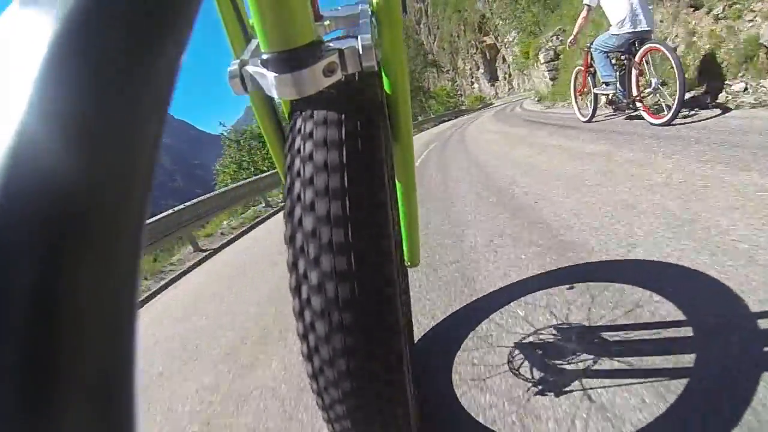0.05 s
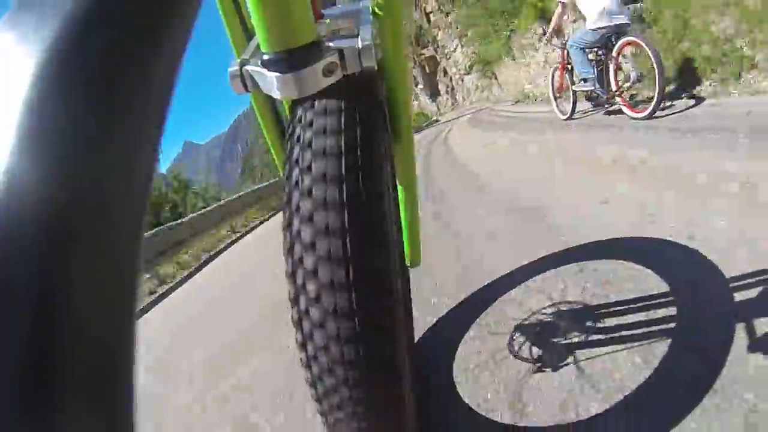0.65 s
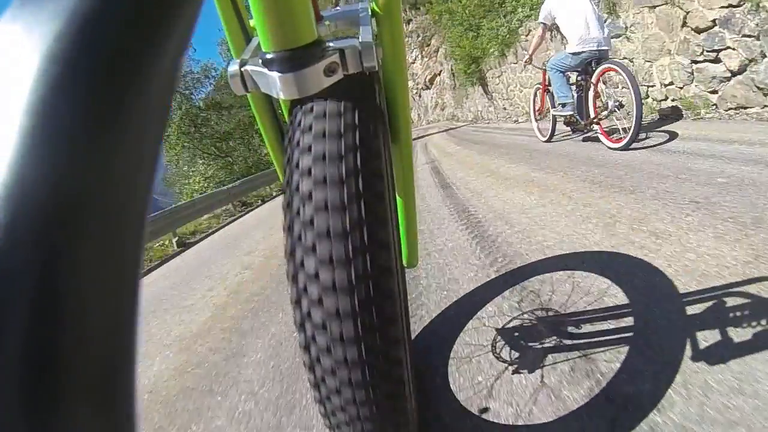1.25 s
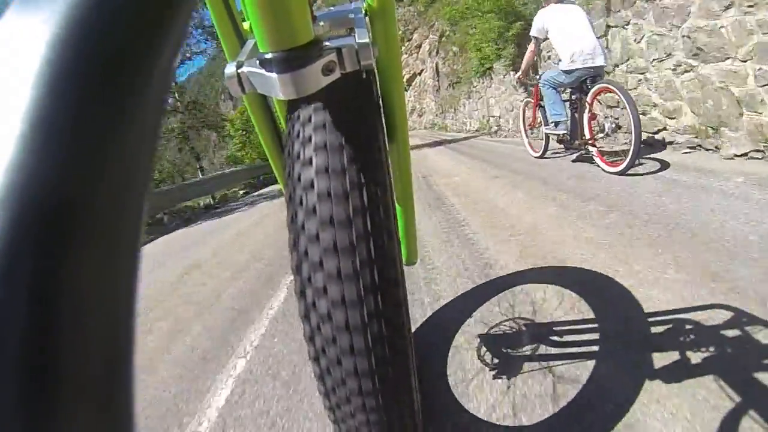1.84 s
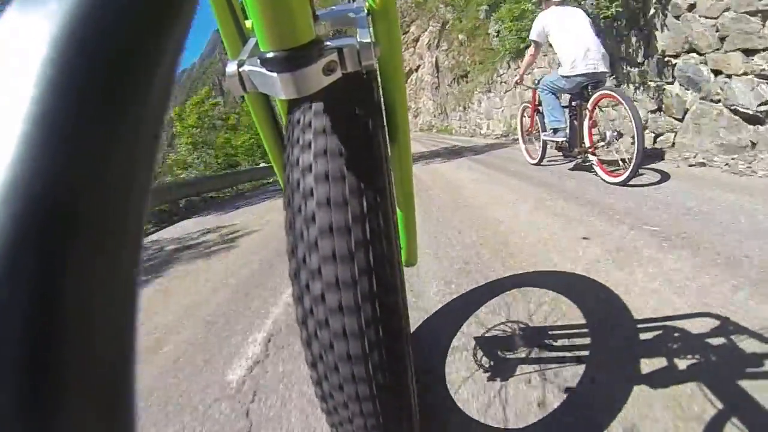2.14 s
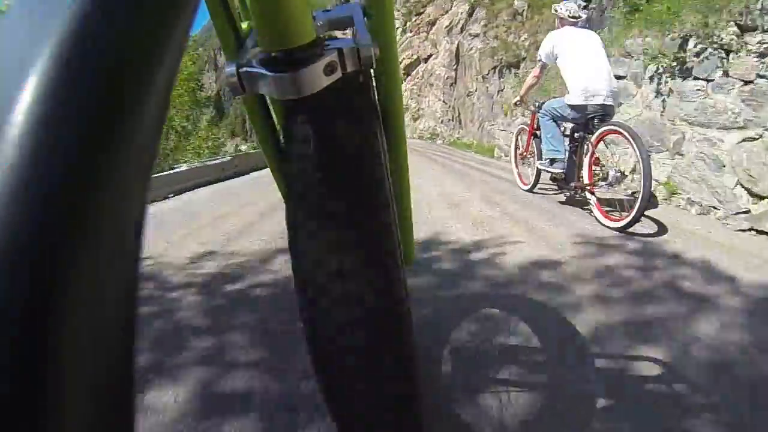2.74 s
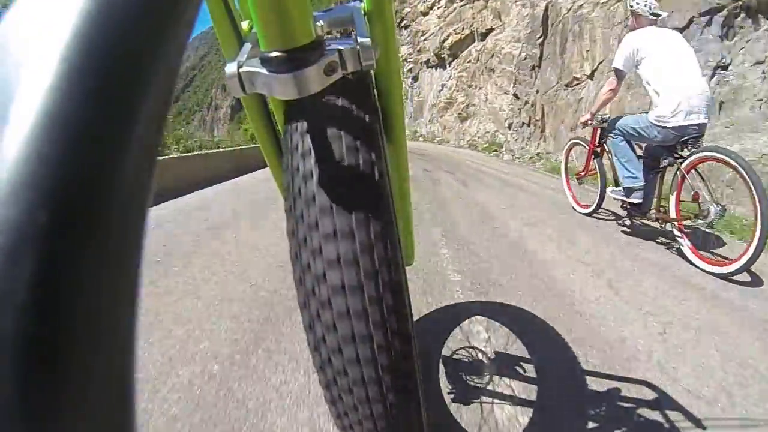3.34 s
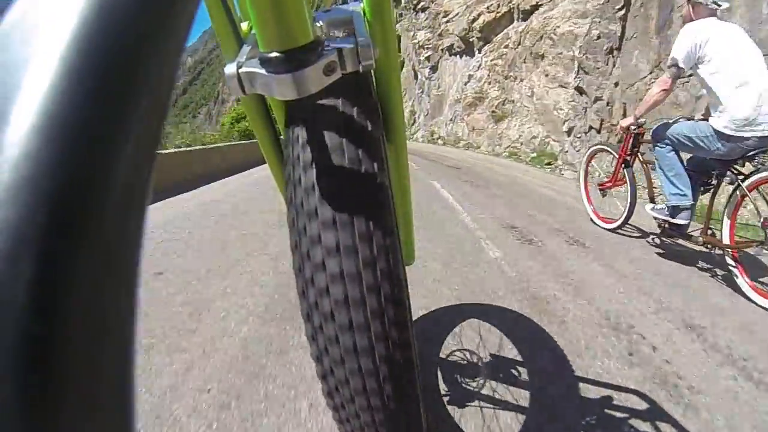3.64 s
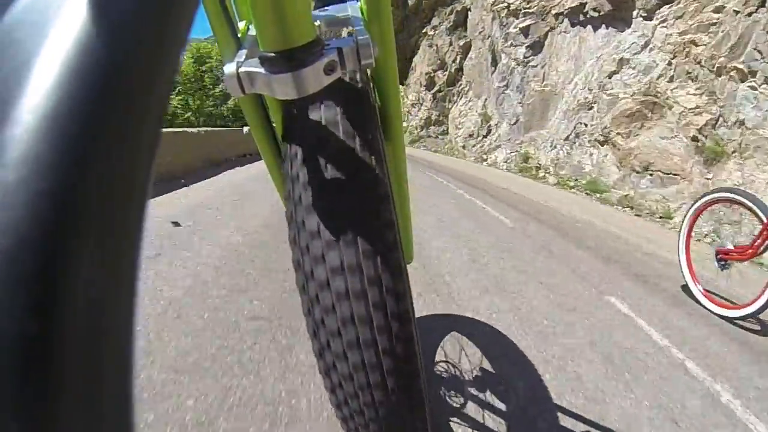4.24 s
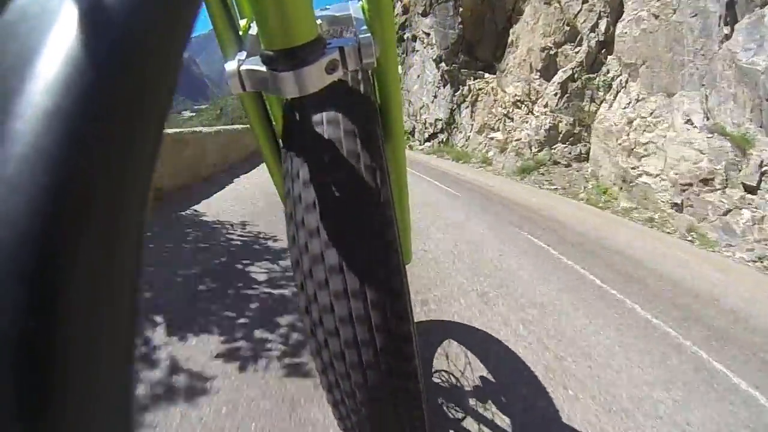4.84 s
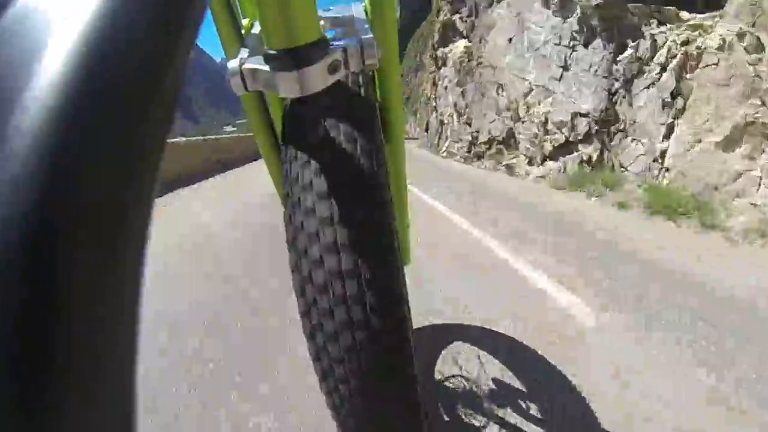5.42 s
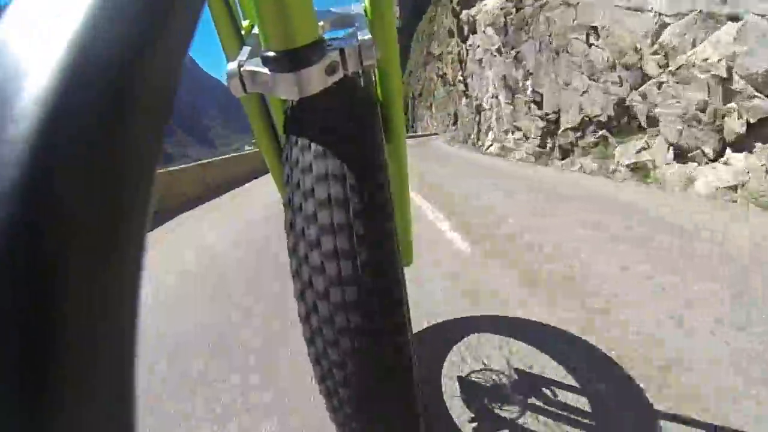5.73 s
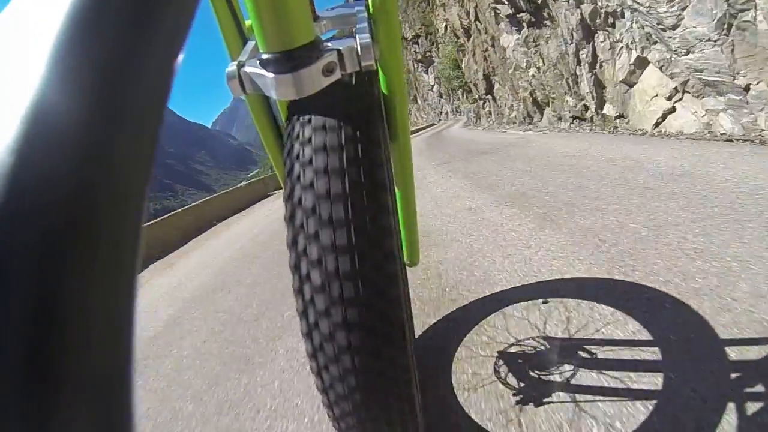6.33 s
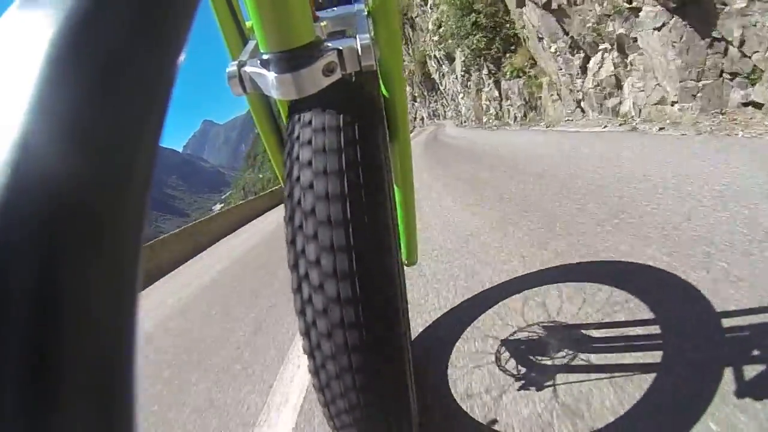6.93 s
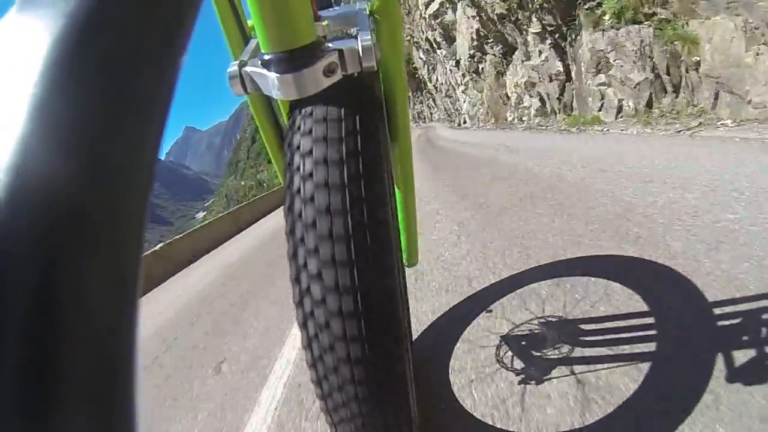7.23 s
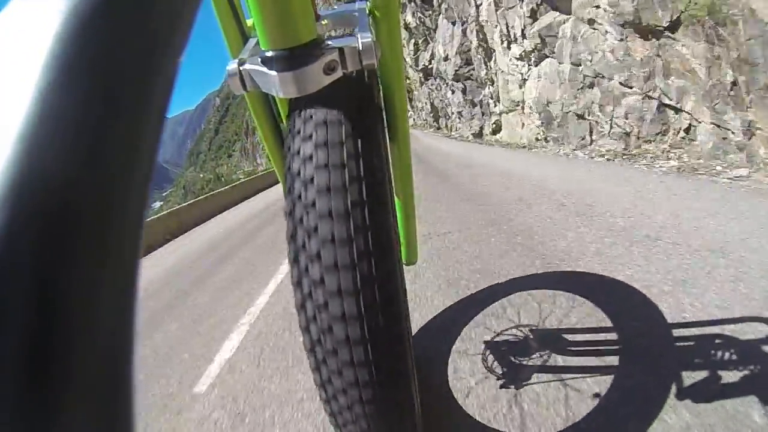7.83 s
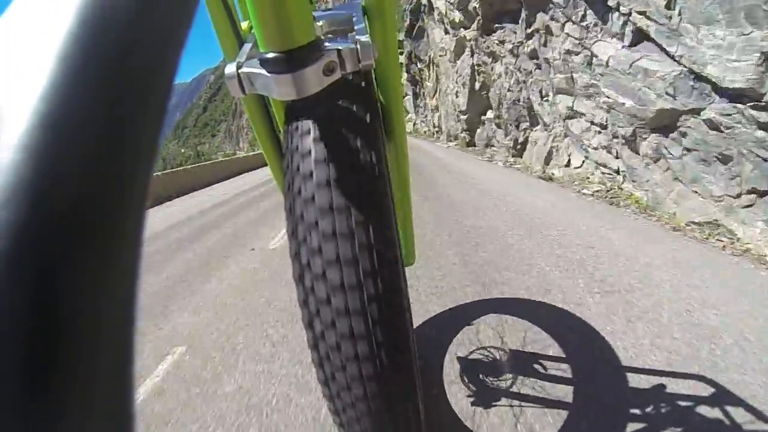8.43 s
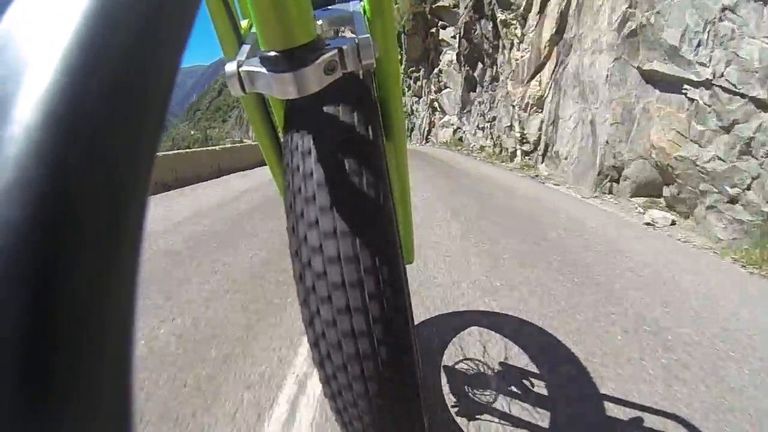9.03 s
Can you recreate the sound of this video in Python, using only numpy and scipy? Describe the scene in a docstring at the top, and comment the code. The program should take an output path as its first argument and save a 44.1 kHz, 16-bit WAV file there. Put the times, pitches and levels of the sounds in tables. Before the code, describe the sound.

Low, fluttering wind hits a microphone mounted close to the wheel of a bicycle rolling downhill outdoors. The tyres roar on rough asphalt, their hum coming and going and climbing with the speed, while the freewheel buzzes softly and a brake pad faintly brushes its disc. Irregular wind thumps build toward the middle, edged with light crackle. Three quick metallic pings of grit follow, then more buffets.

```python
"""A bicycle coasts ever faster down an asphalt mountain road, a camera in a plastic housing by its fork.
From the start wind rumbles on the housing, road grain roars through the frame, the tread hums, the
freewheel buzzes and a brake pad brushes its disc. The hum rises with the speed. From 2.6 s large eddies
strike, the hardest making the camera's limiter duck everything for a moment. By 5 s a fine crackle has
grown on the wind's crests. Near 6.6 s three bits of grit ping off metal; the buffets go on to the end."""
import sys
import numpy as np
from scipy import signal
from scipy.fft import rfft, irfft, next_fast_len
from scipy.io import wavfile
from scipy.ndimage import uniform_filter1d

SR = 44100
rng = np.random.default_rng(int(sys.argv[2]) if len(sys.argv) > 2 else 0)


def inscribe(sig):
    """Save sig as 16-bit PCM at rate SR to the path in sys.argv[1].

    A 1-D sig is mono; a 2-D sig holds one channel per row.
    Samples are clipped to [-1, 1] before scaling.
    """
    pcm = np.round(np.clip(np.atleast_2d(sig).T, -1, 1) * 32767)
    wavfile.write(sys.argv[1], SR, pcm.astype(np.int16))


N = 404397
TIME = np.arange(N) / SR
BLOCKS_PER_TURN = 87  # tread blocks round the tyre


def undb(db):
    """Amplitude ratio of a level: tenfold for every 20 dB."""
    return 10 ** (np.asarray(db) / 20)


def unit(x):
    """Normalisation to an rms of 1."""
    return x / np.sqrt(np.mean(x ** 2))


def curves(table):
    """Linear interpolation of each column against the first, t/s."""
    t, *columns = np.transpose(table)
    return [np.interp(TIME, t, column) for column in columns]


def walk(rate_hz):
    """Random modulation: Gaussian noise of rms 1, low-passed at rate_hz."""
    size = next_fast_len(N)
    f = np.fft.rfftfreq(size, 1 / SR)
    spectrum = rfft(rng.standard_normal(size)) / (1 + (f / rate_hz) ** 4)
    return unit(irfft(spectrum)[:N])


def resonance(x, hz, width_hz):
    """Band-pass response to the excitation x, at an rms of 1."""
    band = signal.butter(2, [hz - width_hz / 2, hz + width_hz / 2], "band", fs=SR, output="sos")
    return unit(signal.sosfilt(band, x))


def body(x, colour, modes=(), size=16384):
    """Minimum-phase filtering: a broad response with resonance peaks standing on it."""
    f = np.maximum(np.fft.rfftfreq(size, 1 / SR), 1)
    hz, db = np.transpose(colour)
    broad_db = np.interp(np.log(f), np.log(hz), db)
    peaks_db = sum(lift / (1 + (2 * (f - centre) / width) ** 2) for centre, width, lift in modes)
    cepstrum = irfft(np.log(undb(broad_db + peaks_db)))
    fold = 1 + np.sign(np.fft.fftfreq(size))  # makes the response causal
    impulse_response = irfft(np.exp(rfft(cepstrum * fold)))
    return signal.fftconvolve(x, impulse_response)[:len(x)]


def brake(rough_db=2.5):
    """Stick-slip friction: the pad excites two high modes of the disc, a thin sizzle."""
    # disc resonances: f/Hz, width/Hz
    disc_modes = [(11880, 480), (13230, 230)]
    # their strength re the frame roar: t/s, lower mode level/dB, upper mode level/dB
    mode_levels = [(0, -33, -48), (1.1, -33.5, -47), (1.4, -32, -39), (2.5, -41, -49), (3.1, -38, -40),
                   (4.3, -37, -39.5), (6, -36.5, -52.5), (9.17, -41, -55.5)]
    sizzle = 0
    for (hz, width_hz), db in zip(disc_modes, curves(mode_levels)):
        friction = rng.standard_normal(N) * undb(rough_db * walk(120))
        sizzle = sizzle + resonance(friction, hz, width_hz) * undb(db)
    return sizzle


def freewheel(turns, teeth_per_turn=20, strike_db=17, scrape_s=0.0055, scatter_db=0.5):
    """Periodic impact: a pawl strikes and scrapes at each ratchet tooth, ringing the hub."""
    # broad response of the hub: f/Hz, level/dB
    hub_colour = [(1500, -24), (4400, -7.5), (5250, -2.5), (6100, -11), (7200, -32), (8400, -9.5),
                  (9750, -9.5), (10200, -18), (11000, -20), (11900, -15.5), (12500, -9.5), (13400, -14),
                  (13900, -24), (15000, -22)]
    # hub resonances: f/Hz, width/Hz, lift/dB
    hub_modes = [(4690, 70, 7), (4937, 40, 9), (5012, 30, 6), (5155, 90, 14.2), (5345, 90, 12),
                 (5485, 44, 8.5), (5935, 30, 6), (6010, 60, 13), (8270, 90, 5), (8870, 200, 9),
                 (9820, 70, 8)]
    teeth = teeth_per_turn * turns
    age_s = teeth % 1 / np.gradient(teeth) / SR
    scrapes = rng.standard_normal(N) * np.exp(-age_s / scrape_s)
    scrapes *= undb(scatter_db * rng.standard_normal(N)[teeth.astype(int)])
    strikes = np.diff(np.floor(teeth), prepend=0) * undb(strike_db)
    hub = body(strikes + scrapes, hub_colour, hub_modes)
    # the pawl's force throbs three times a turn, most of all in the low shell modes
    throb_db = 3.4 * np.sin(2 * np.pi * 3 * turns)
    shell = signal.sosfiltfilt(signal.butter(4, 7000, fs=SR, output="sos"), hub)
    return unit(shell * undb(throb_db) + (hub - shell) * undb(.4 * throb_db))


def grit(crack_s=0.0031, tail_s=0.015, tail_db=-11, size=8192):
    """Impact and free decay: a stone cracks against metal, which rings; a glancing blow is duller."""
    # stones flung at the frame: t/s, level/dB, ring level re the crack/dB, low-pass f/Hz
    stones = [(6.561, -25, -9.5, 7500), (6.654, -26.5, -10, 3200), (6.744, -18.8, -12, 15000)]
    # spectrum of the crack: f/Hz, level/dB
    crack_colour = [(300, -11), (800, 0), (1500, 3), (2650, 10), (3400, 3), (5000, -.5), (6500, -5),
                    (7600, -20), (9500, -7.5), (11000, -11), (12500, -15), (15000, -17)]
    # modes of the metal: f/Hz, level/dB, T60/s
    metal_modes = [(1728, 4, .13), (2148, -5, .08), (2546, -2, .11), (2620, -2, .04), (2870, -8, .04),
                   (3600, -9, .035), (5157, -12, .04), (6200, -21, .07), (8829, -14, .12), (8931, -17, .1),
                   (9555, -22, .1), (10490, -23, .08)]
    pings, age = np.zeros(N), np.arange(size) / SR
    envelope = np.exp(-age / crack_s) + undb(tail_db) * np.exp(-age / tail_s)
    ring = sum(undb(db - 60 * age / t60) * np.sin(2 * np.pi * hz * age) for hz, db, t60 in metal_modes)
    for t, db, ring_db, cutoff_hz in stones:
        crack = body(rng.standard_normal(size) * envelope, crack_colour)
        blow = crack / np.abs(crack).max() + undb(ring_db) * ring
        start = int(t * SR)
        pings[start:start + size] += undb(db) * signal.lfilter(*signal.butter(2, cutoff_hz, fs=SR), blow)
    return pings


def tyre_swells():
    """Narrow-band noise: now and then one part of the tyre's roar rings out above the rest."""
    # Gaussian swells: t/s, half length/s, centre f/Hz, width/Hz, level/dB
    swells = [(.15, .3, 694, 110, -30.5), (1.0, 0.9, 657, 36, -32), (2.504, 0.21, 855, 90, -26.5),
              (3.45, 0.35, 960, 110, -32.5), (5.853, .3, 958, 110, -32.5)]
    roar = 0
    for t, half_s, hz, width_hz, db in swells:
        envelope = undb(db) * np.exp(-((TIME - t) / half_s) ** 2)
        roar = roar + resonance(rng.standard_normal(N), hz, width_hz) * envelope
    return roar


def tread(turns, rough_db=2.5, octave_db=-13):
    """Periodic forcing: tread blocks slap the road, whose coarseness modulates their phase and force."""
    # the hum comes and goes as the tyre leans: t/s, level/dB, fast phase jitter/rad
    hum = [(0, -30.5, 0.45), (.35, -36, 0.42), (.62, -25, 0.35), (.85, -27.5, 0.49), (1.15, -28.5, 0.32),
           (1.6, -29, 0.45), (2.3, -28.5, 0.55), (2.7, -29.5, 1.5), (3.4, -32, 0.82), (4.0, -28, 0.76),
           (4.45, -26, 0.35), (4.8, -29, 1), (5.05, -28, 0.36), (5.45, -29.5, 0.62), (5.75, -33.5, 0.8),
           (6.08, -26, .4), (6.45, -31.5, .7), (6.95, -38, 0.7), (7.25, -29, .6), (7.65, -39, 0.73),
           (7.9, -28.5, 0.4), (8.3, -26.5, 0.87), (8.7, -33.5, 1), (9.17, -39, 0.9)]
    db, jitter = curves(hum)
    phase = 2 * np.pi * BLOCKS_PER_TURN * turns + jitter * walk(33) + walk(5.8)
    tone = np.sin(phase) + undb(octave_db) * np.sin(2 * phase)
    return unit(tone * undb(rough_db * walk(24))) * undb(db)


def road(turns, grain_db=2, patch_db=0.8, wobble=0.02):
    """Random forcing of resonators: asphalt chips drum on the hollow tyre and ring fork and housing."""
    # broad responses of frame and tyre: f/Hz, level/dB
    frame_colour = [(500, -19.5), (1100, -6), (1290, -0.5), (1550, 1), (2000, -3.5), (2180, -3),
                    (2310, -13), (2950, -18), (3800, -21.5), (6000, -37.5), (7500, -48), (15000, -43.5)]
    tyre_colour = [(120, -16), (330, -3.5), (500, -1), (570, -1), (760, 2.5), (880, -2), (1015, -1),
                   (1100, -26), (1500, -35), (4000, -65.5)]
    # their resonances: f/Hz, width/Hz, lift/dB
    frame_modes = [(1153, 63, 7.4), (1447, 18, 10), (1516, 30, 4.6), (1729, 19, 10.4), (1780, 24, 4.4),
                   (1897, 13, 9.2), (2547, 28, 7.5), (2600, 18, 7.5), (2740, 30, 6), (3579, 35, 5),
                   (3712, 35, 6), (3979, 35, 8), (4502, 30, 7)]
    tyre_modes = [(475, 48, 7), (652, 23, 9.5), (708, 24, 6.5), (788, 33, 5.5), (928, 45, 4),
                  (1005, 27, 2.5)]
    # the tyre's boom re the frame roar: t/s, level/dB
    boom_level = [(0, 8), (2.2, 9), (3.2, 7), (5.7, 6.5), (7.2, 8.5), (9.17, 7.5)]
    patches = undb(patch_db * walk(6.1)) * (1 + wobble * np.sin(2 * np.pi * turns))
    chips = rng.standard_normal(N) * undb(grain_db * walk(400)) * patches
    roar = unit(body(chips, frame_colour, frame_modes))
    boom = unit(body(chips, tyre_colour, tyre_modes))
    return roar + undb(curves(boom_level)[0]) * boom


def crackle(air, threshold=0.42):
    """Flow separation: where the pressure crests, the air tears at the housing with a fine crackle."""
    # gain of the crackle: t/s, level/dB
    crackle_level = [(0, -60), (3.5, -57), (5, -52), (9.17, -51.5)]
    colour = [(2000, 1), (4000, 2), (7000, 1), (10000, -6), (14000, -17)]  # f/Hz, level/dB
    crest = np.clip((np.abs(air) - threshold) / .25, 0, 1.3)
    pops = rng.standard_normal(N) * unit(undb(4 * walk(700))) * crest
    return body(pops, colour) * undb(curves(crackle_level)[0])


def wind(split_hz=110, bound=1.88, flutter_db=3.5, flutter_hz=50):
    """Turbulence on the housing: an even rumble under small eddies that come in intermittent bursts."""
    # pressure spectrum: f/Hz, level/dB
    wind_colour = [(8, -34), (16, -4), (26, -1), (60, -0.5), (100, -5), (160, -8), (250, -14.5), (400, -21),
                   (700, -27), (1000, -30), (1300, -50), (2500, -50), (6000, -71), (15000, -95)]
    # brief loud flapping of the small eddies: t/s, half length/s, lift/dB
    flurries = [(2.031, .008, 9), (4.837, .022, 9), (5.59, .03, 8), (5.891, .025, 8), (8.03, .02, 6),
                (9.093, .007, 9)]
    # gain of the rumble against the small eddies: t/s, level/dB
    rumble_level = [(0, 0), (1.3, 2), (1.9, 2), (2.6, 1.1), (5.2, 2), (5.8, .5), (9.17, 0.9)]
    pressure = unit(body(rng.standard_normal(N), wind_colour))
    rumble = signal.sosfiltfilt(signal.butter(2, split_hz, fs=SR, output="sos"), pressure)
    flurry_db = sum(lift * np.exp(-((TIME - t) / half_s) ** 2) for t, half_s, lift in flurries)
    bursts = np.minimum(walk(flutter_hz), 1.7)
    eddies = (pressure - rumble) * unit(undb(flutter_db * bursts + flurry_db))
    bounded = bound * np.tanh(rumble / bound)  # the air speed bounds the pressure of ordinary eddies
    return unit(bounded * undb(curves(rumble_level)[0]) + eddies)


def buffets(air, rebound=0.33, ragged_db=-24, click_ms=0.7, lesser_per_s=1.5):
    """Vortex impact: an eddy displaces the wind with a bump and rebound; a sharp click marks its crest."""
    # the largest eddies: t/s, signed amplitude/full scale, half length/ms, click level/dB
    largest = [(2.557, -.9, 3, -47), (3.781, .85, 3.5, -39), (3.837, -1.0, 2.5, -46), (4.193, 1.7, 2, -42),
               (4.699, 1.45, 2.3, -37), (5.071, .65, 2, -47), (5.14, .65, 1.5, -46),
               (5.187, -1.6, 2.4, -39), (5.277, -.8, 1.6, -45), (5.337, .8, 1.6, -45), (5.377, .85, 2, -46),
               (5.607, 1.6, 1.6, -36), (5.768, -.8, 2.6, -43), (5.852, .65, 1.6, -48),
               (5.914, 1.6, 1.5, -36), (7.144, .8, 2.2, -44), (7.18, -1.2, 2, -45), (7.282, 1.15, 1.8, -38),
               (7.35, -.7, 2, -45), (7.621, .75, 2.2, -45), (8.018, .85, 2, -45), (8.219, .65, 2, -45),
               (8.309, .62, 2, -46), (8.545, 1.2, 2.1, -38), (8.704, .7, 3, -47), (8.8, -1.35, 2.1, -41),
               (8.931, -.62, 2.2, -46), (8.954, .6, 2, -46)]
    # spectra of the click and of the bump's raggedness: f/Hz, level/dB
    click_colour = [(1000, -8), (2500, 0), (4500, 0), (7000, -6), (10000, -14), (14000, -26)]
    ragged_colour = [(80, -19.0), (200, 2.0), (700, -10), (2000, -18.5), (8000, -72.5)]
    chance = rng.random((int(lesser_per_s * N / SR), 2))  # lesser eddies: random time and sign
    lesser = [(when * N / SR, 0.58 * np.sign(way - .5), 2.22, -53) for when, way in chance]
    bumps, clicks, sheltered = np.zeros(N), np.zeros(N), np.ones(N)
    for t, amplitude, half_ms, click_db in largest + lesser:
        near = np.abs(TIME - t) < .04
        ms = (TIME[near] - t) * 1000
        age = ms / half_ms
        bumps[near] += amplitude * (np.exp(-age ** 2) - rebound * np.exp(-(age - 2) ** 2))
        clicks[near] += undb(click_db) * np.exp(-(ms / click_ms - 1) ** 2)
        sheltered[near] *= 1 - np.exp(-(age / 2) ** 2)
    ragged = 1 + undb(ragged_db) * unit(body(rng.standard_normal(N), ragged_colour))
    click_noise = unit(body(rng.standard_normal(N), click_colour))
    return air * sheltered + bumps * ragged + clicks * click_noise


def scene(wind_db=1.5, gust_db=1.0, gust_hz=4):
    """Superposition: one wheel speed times tread and pawl; roar, hub and brake rise and fall together."""
    # rate at which tread blocks meet the road: t/s, f/Hz
    block_rate = [(0, 377.1), (2.2, 414.4), (4.1, 471.4), (5.9, 481.7), (8, 495.4), (9.17, 517.3)]
    # strength of the wind re wind_db, before gusts: t/s, level/dB
    wind_level = [(0, -15), (.5, -14.5), (1.65, -12.5), (2.0, -17), (3.2, -15), (3.8, -11.5), (4.4, -15),
                  (5.5, -15), (6.7, -12.5), (7.4, -14), (9.17, -14)]
    # overall level of the road noise, given for the frame roar: t/s, level/dB
    road_level = [(0, -34.5), (.8, -31.5), (1.75, -33.5), (2.5, -32), (3.4, -30), (3.8, -30.5), (4.7, -32),
                  (5.3, -35.5), (5.8, -34.5), (6.1, -36), (6.85, -32.5), (7.4, -36.5), (8.3, -33.5),
                  (9.17, -32.5)]
    # freewheel buzz re the frame roar: t/s, level/dB
    buzz_level = [(0, -24.5), (2.4, -25.5), (2.9, -23.5), (4.1, -23.5), (4.8, -24), (6, -26.5),
                  (7.5, -26.5), (8.4, -26), (9.17, -27)]
    turns = np.cumsum(curves(block_rate)[0]) / SR / BLOCKS_PER_TURN
    gusting = wind() * undb(curves(wind_level)[0] + wind_db - gust_db * walk(gust_hz))
    air = buffets(gusting)
    ride_noise = road(turns) + freewheel(turns) * undb(curves(buzz_level)[0]) + brake()
    ride_noise *= undb(curves(road_level)[0])
    return (air + crackle(air) + ride_noise + tyre_swells() + tread(turns) + grit())[None]


def record(dry, ceiling=0.76, attack_s=0.0016, release_s=0.18, top_hz=15000):
    """Peak limiting: the camera ducks each overload, recovers slowly and cuts the highest treble."""
    overload = np.log(np.maximum(np.abs(dry[0]) / ceiling, 1))
    fade = np.exp(-TIME / release_s)
    held = np.maximum.accumulate(overload / fade) * fade  # the largest recent overload, dying away
    gain = np.exp(-uniform_filter1d(held, int(attack_s * SR)))
    return signal.sosfilt(signal.ellip(12, .2, 80, top_hz, fs=SR, output="sos"), dry * gain)


dry = scene()
out = record(dry)
inscribe(out)
```